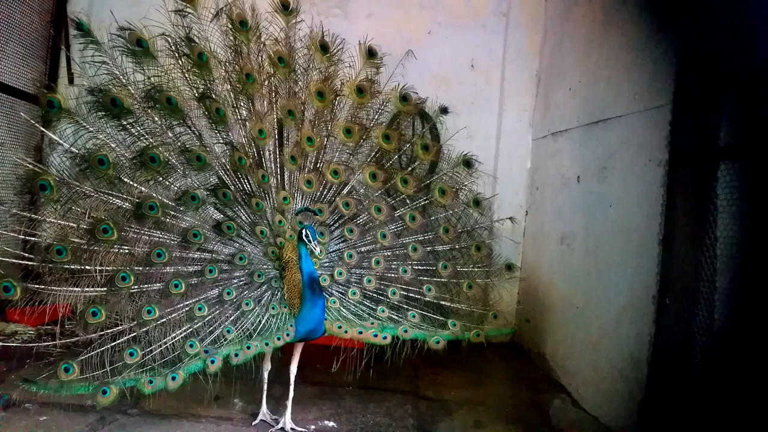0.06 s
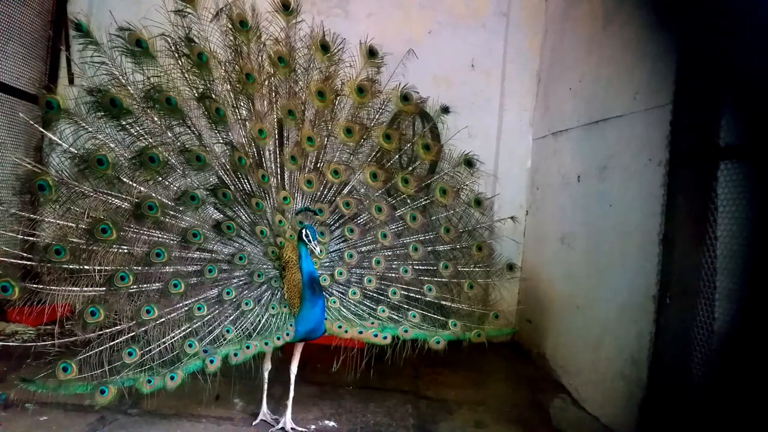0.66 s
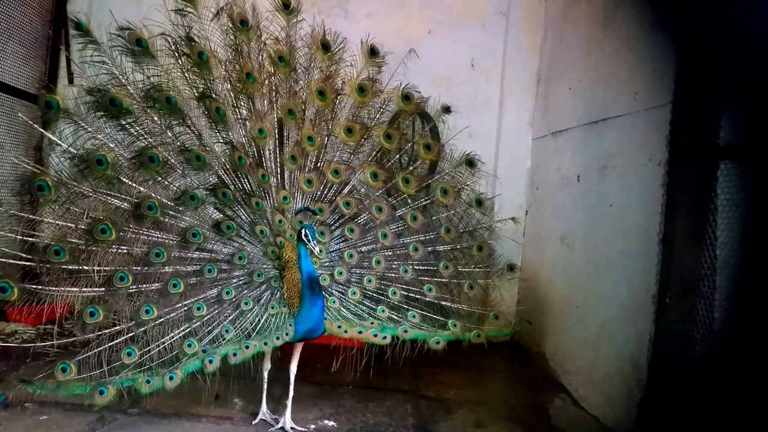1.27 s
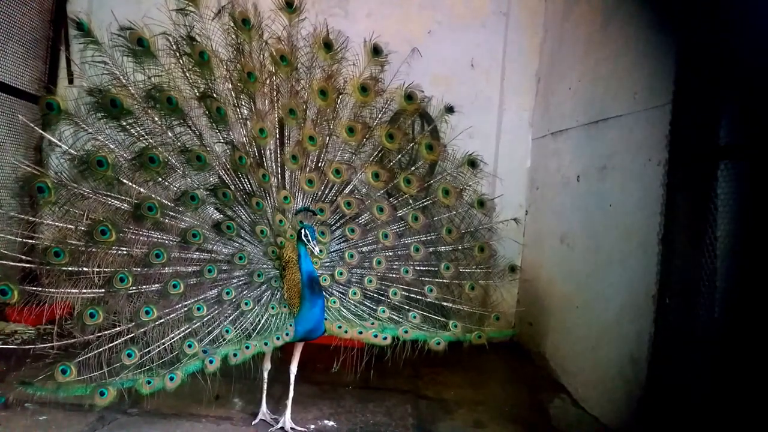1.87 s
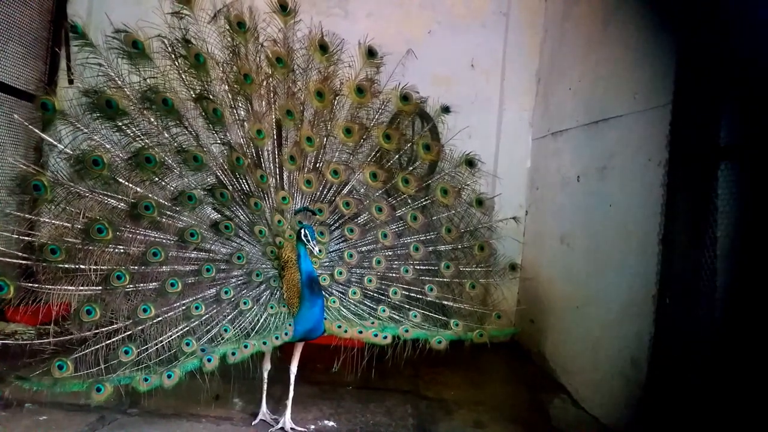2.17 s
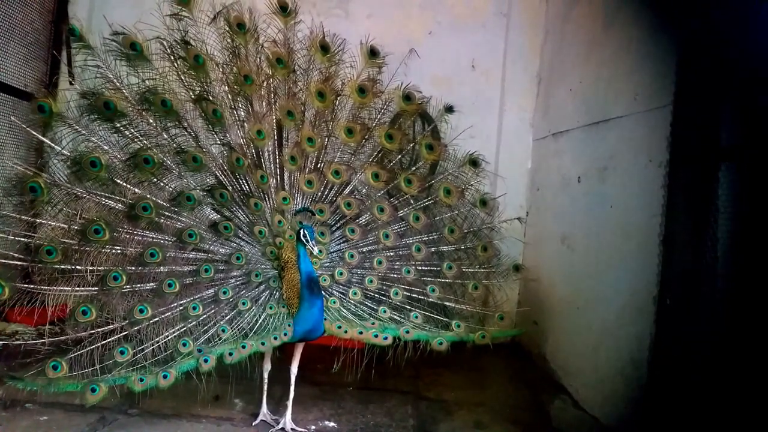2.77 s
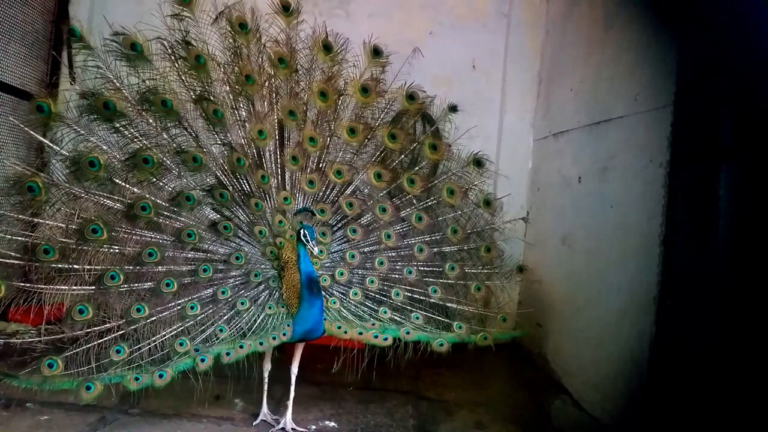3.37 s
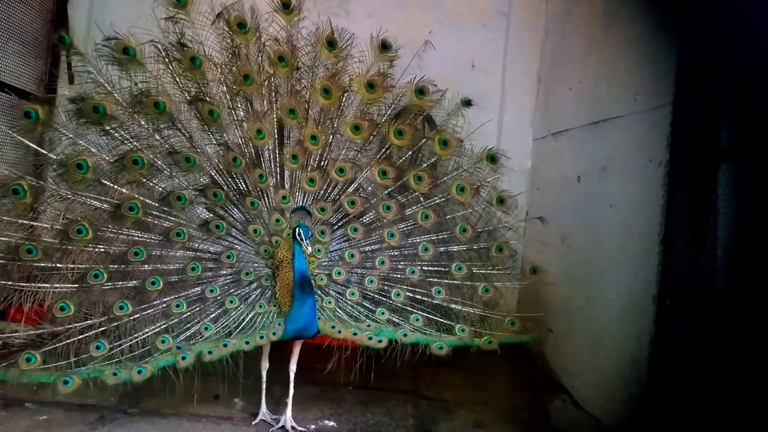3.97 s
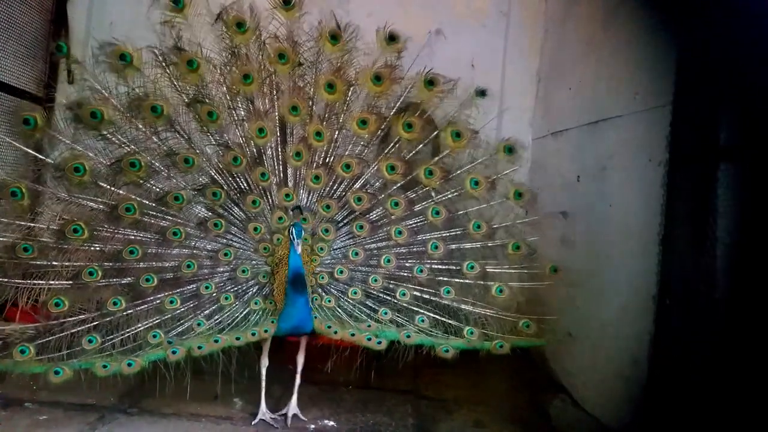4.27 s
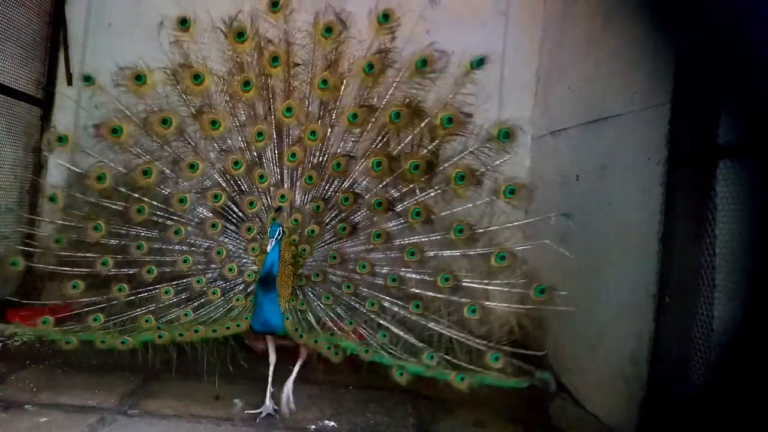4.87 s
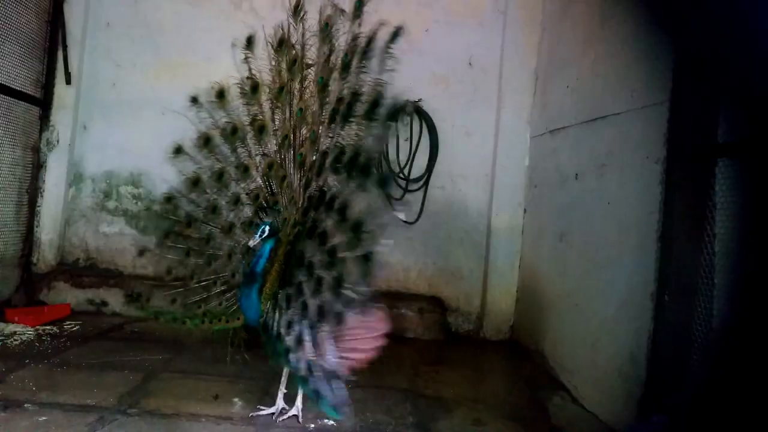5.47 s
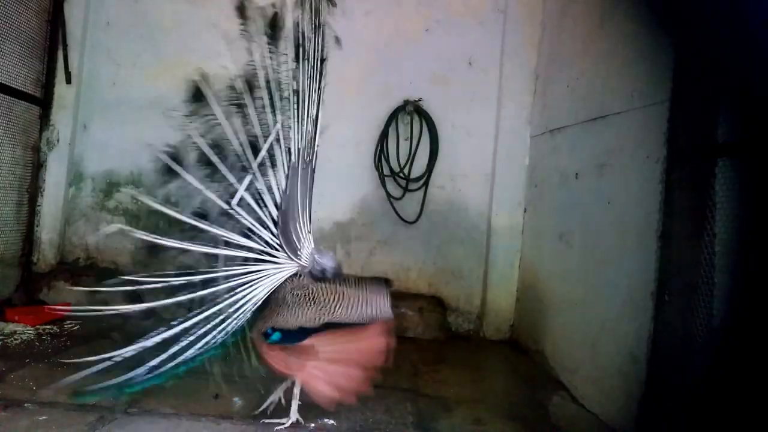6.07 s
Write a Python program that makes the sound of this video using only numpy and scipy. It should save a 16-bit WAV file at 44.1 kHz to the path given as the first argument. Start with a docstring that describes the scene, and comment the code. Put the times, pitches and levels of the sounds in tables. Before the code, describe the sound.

Over a low outdoor rumble and faint hiss, birds yelp and whistle some way off, and a nearby peacock makes a few soft ticks and scrapes. One loud, brief, nasal honk from the peacock rings off the walls of its pen. Four high, rising yelps answer from the distance, while close by the peacock turns with a quiet swishing of feathers, small quill clicks and light footsteps.

```python
"""A peacock displays in a hard-walled pen, over a bed of low outdoor rumble and thin hiss.
Far birds open with rising two-note yelps, then thin and hoarse whistles, while he stirs softly.
At about 3 s he gives one loud, arching honk: a buzzing membrane rings through windpipe and beak.
A low drone comes up and he turns on the spot as the far birds yelp back: plumes rustle,
quills tick, and his feet tap and scrape the floor."""
import sys
import numpy as np
from scipy import signal
from scipy.fft import rfft, irfft, next_fast_len
from scipy.io import wavfile

SR = 44100
rng = np.random.default_rng(int(sys.argv[2]) if len(sys.argv) > 2 else 0)


def store_pcm(level_fs):
    """Save levels as 16-bit WAV."""
    pcm = np.round(np.clip(level_fs, -1, 1) * 32767).astype(np.int16)
    wavfile.write(sys.argv[1], SR, np.atleast_2d(pcm).T)


N = 270333
TIME = np.arange(N) / SR

# stereo image of diffuse noise: (frequency [Hz], left-right likeness [0-1])
STEREO_LIKENESS = [(60, 0.97), (170, 0.93), (350, 0.83), (700, 0.35), (1500, 0), (10000, 0.011)]
# reverb time of the pen: (frequency [Hz], T60 [s])
PEN_T60 = [(300, 0.56), (1000, 0.36), (2300, 0.56), (5000, 0.57), (12000, 0.24)]
# tone of the bed's rumble, midrange air and narrow hiss: (frequency [Hz], gain [dB])
RUMBLE_EQ = [(21, -49), (35, -7.5), (76, -2), (108, -3.5), (130, -0.5), (227, -5), (273, -8.5), (383, -7.5),
             (447, -15.5), (513, -14.5), (555, -16), (828, -20), (1400, -31), (1820, -42), (3080, -120)]
AIR_EQ = [(1000, -18), (1500, 13.5), (2500, 13), (4000, 4), (6000, -7), (7000, -61.5)]
HISS_EQ = [(6500, -25), (7300, -7.5), (8000, 7), (8700, 1), (10000, -7), (10800, -23), (13000, -52)]

# throat resonances of the far birds: (frequency [Hz], gain [dB])
FAR_THROAT = [(1100, 8), (1500, 1), (2200, 5.5), (3030, -0.5), (3220, 1), (3700, 5.5), (4500, -2),
              (5200, -10), (5900, -20), (7000, -19.5), (9000, -39)]
# harmonics of the yelps and of the whistles: (harmonic [number], level [dB])
YELP_PARTIALS = [(1, 3), (2, -7), (3, -5), (4, 2)]
WHISTLE_PARTIALS = [(1, 4.5), (2, -10.5)]
# two-note yelps: (start [s], slide [s], hold [s], fall [s], start pitch [Hz], top pitch [Hz],
# slide level [dB], top level [dB])
YELPS = [(0.054, .085, 0.032, 0.041, 1321, 2390, -44.5, -48.5),
         (0.251, 0.081, .045, 0.09, 1674, 2940, -33.5, -33.5),
         (3.775, 0.12, 0.094, 0.028, 1447, 2982, -43, -33.5),
         (4.001, 0.08, 0.056, 0.065, 1657, 2925, -31, -31.5),
         (4.986, .098, .048, .105, 1526, 2900, -35.5, -33.5),
         (5.398, 0.11, 0.024, 0.1, 1597, 2937, -35, -34)]
# whistles and hoarse cries: (start [s], length [s], start pitch [Hz], end pitch [Hz], level [dB],
# fade [dB], roughness [0-1])
WHISTLES = [(0.992, .1, 1985, 2110, -45.5, -9, 0.16), (2.022, 1.03, 1920, 2265, -47.5, -4.5, 0.93),
            (2.375, 0.084, 1714, 1652, -43.5, -1.5, 0.8), (2.541, .48, 2612, 2670, -52, -3.5, 0.84)]
# envelope of the long thin whistle: (time [s], level [dB])
THIN_WHISTLE_LEVEL = [(1.06, -56), (1.084, -54.5), (1.198, -65), (1.23, -59), (1.684, -64), (1.746, -77),
                      (1.768, -58.5), (1.85, -55.5), (1.94, -55)]
# its pitch settles, holds and droops: (time [s], pitch [Hz])
THIN_WHISTLE_PITCH = [(1.06, 2468), (1.2, 2418.5), (1.8, 2411.5), (1.94, 2365)]

# tone of floor scrapes, foot taps and feathers: (frequency [Hz], gain [dB])
SCUFF_EQ = [(400, -14.5), (750, 0.5), (1000, 4), (1300, -2.5), (2000, -5.5), (4000, -17), (8000, -32),
            (13000, -46)]
STEP_EQ = [(200, 10), (500, 2), (1000, 9.5), (1900, -0.5), (3500, -10), (8000, -52)]
FEATHER_EQ = [(600, -39), (1500, 7), (2500, -2), (4500, 1), (6500, -5.5), (8500, -1.5), (11000, -4),
              (16000, -19)]
# scrapes on the floor and swishes of the train: (peak time [s], length [s], level [dB])
SCUFFS = [(1.83, 0.057, -47), (1.965, 0.23, -41), (5.77, 0.18, -51), (6.02, 0.14, -58)]
SWISHES = [(.42, 0.16, -59), (.84, 0.095, -64), (1.62, 0.26, -60), (1.98, 0.08, -63), (2.44, .16, -60),
           (4.355, 0.071, -53), (4.485, 0.043, -53.5), (4.645, 0.11, -50.5), (4.775, 0.15, -56.5),
           (4.96, 0.18, -53.5), (5.125, 0.094, -51.5), (5.36, 0.091, -50), (5.52, 0.057, -50),
           (5.62, .1, -55), (5.705, 0.24, -50), (5.855, 0.023, -42.5), (5.912, 0.031, -53),
           (6.02, 0.14, -49)]
# feet tapping the floor and quills snapping past each other: (time [s], relative peak [dB])
STEPS = [(0.304, -42.5), (0.928, -61), (4.487, -44.5), (4.667, -55), (5.338, -51), (5.364, -46),
         (5.746, -42), (5.846, -34.5), (6.011, -43)]
QUILL_TICKS = [(0.2625, -27.5), (1.6234, -38), (4.2718, -32.5), (4.6508, -34), (4.9469, -36), (5.1174, -32),
               (5.6814, -39), (5.8403, -32), (5.9052, -57), (5.956, -43)]

# air rasping through the syrinx: (frequency [Hz], gain [dB])
RASP_EQ = [(2000, -14.5), (4100, -4.5), (4600, 0), (5200, 6.5), (6000, -13), (7000, -6), (7600, -34),
           (10300, -6), (12000, -37), (15500, -24)]
# resonances of the peacock's windpipe and open beak: (frequency [Hz], gain [dB])
PEACOCK_THROAT = [(740, -6.5), (1050, -17), (1450, -2.5), (1780, -0.5), (2100, 8.5), (2600, -6), (2850, -2),
                  (3230, 1), (3500, -22), (4080, -25), (4350, -14.5), (4800, -6), (5600, -6.5),
                  (7230, -19.5), (7500, -28), (15000, -36.5)]


def from_db(db):
    """Decibels to gain."""
    return 10 ** (np.asarray(db) / 20)


def rms_one(x):
    """Scale to unit rms."""
    return x / np.sqrt(np.mean(x ** 2) + 1e-20)


def pan(x, left_db):
    """Lift the left side and dip the right by as much; negative leans right."""
    return x * from_db([[left_db], [-left_db]])


def ramp(start_s, length_s, ends):
    """A straight fader move between two values."""
    return np.interp(TIME, [start_s, start_s + length_s], ends)


def in_time(rows, t):
    """Read each column of an envelope at the times t."""
    times, *columns = np.transpose(rows)
    return [np.interp(t, times, column) for column in columns]


def at_hz(points, hz):
    """Read a curve on a log-frequency axis."""
    frequencies, values = np.transpose(points)
    return np.interp(np.log(np.maximum(hz, 1)), np.log(frequencies), values)


def drift(rate_hz, size):
    """Smooth random modulation with a spread of about 1."""
    lowpass = signal.butter(4, rate_hz, fs=SR, output="sos")
    return rms_one(signal.sosfilt(lowpass, rng.standard_normal(size + SR))[SR:])


def bandpass(x, low_hz, high_hz):
    """Keep one band, with gentle skirts."""
    return signal.sosfilt(signal.butter(2, [low_hz, high_hz], "band", fs=SR, output="sos"), x)


def equalise(x, curve):
    """Shape a sound with an EQ curve."""
    size = x.shape[-1]
    padded = next_fast_len(size)
    hz = np.arange(padded // 2 + 1) * SR / padded
    return irfft(rfft(x, padded) * from_db(at_hz(curve, hz)), padded)[..., :size]


def diffuse_noise(curve):
    """Noise from all around: centred in the bass, wide in the treble."""
    mid_eq = [(hz, 10 * np.log10(1 + likeness)) for hz, likeness in STEREO_LIKENESS]
    side_eq = [(hz, 10 * np.log10(1.001 - likeness)) for hz, likeness in STEREO_LIKENESS]
    mid = equalise(rng.standard_normal(N), mid_eq)
    side = equalise(rng.standard_normal(N), side_eq)
    return rms_one(equalise(np.array([mid + side, mid - side]), curve))


def pen_reverb(x, direct_db, wet_db, build_s, lag_s=0):
    """Direct sound, lag_s later on the right, plus wall echoes that build and die band by band."""
    t = TIME[:SR]
    edges_hz = np.geomspace(150, 18000, 9)
    white = rng.standard_normal((2, 2, SR))
    tail = np.zeros((2, SR))
    for k, (low, high) in enumerate(zip(edges_hz, edges_hz[1:])):
        t60_s = at_hz(PEN_T60, np.sqrt(low * high))
        tail += bandpass(white[k % 2], low, high) * from_db(-60 * t / t60_s)
    tail *= 1 - np.exp(-t / build_s)
    tail /= np.sqrt(np.sum(tail ** 2, axis=1, keepdims=True))
    stereo = np.broadcast_to(x, (2, N))
    direct = np.array([stereo[0], np.roll(stereo[1], round(lag_s * SR))])
    echoes = signal.fftconvolve(stereo, tail, axes=1)[:, :N]
    return from_db(direct_db) * direct + from_db(wet_db) * echoes


def hum(pitch_hz, waver_hz):
    """A low sine of unit rms that wavers in pitch."""
    pitch = pitch_hz + waver_hz * drift(5.5, N)
    return np.sqrt(2) * np.sin(2 * np.pi * np.cumsum(pitch) / SR)


def outdoor_bed():
    """Distant rumble, faint air and a hum; a lower drone fades up halfway through."""
    steady_hum = from_db(-54) * hum(pitch_hz=104.1, waver_hz=2.116)
    drone_db = ramp(start_s=3.33, length_s=0.27, ends=(-70, -53.5))
    drone = from_db(drone_db) * hum(pitch_hz=78.8, waver_hz=3.94)
    rumble = from_db(-45.5) * diffuse_noise(RUMBLE_EQ)
    air = from_db(-61.5) * diffuse_noise(AIR_EQ)
    return pan(steady_hum + drone + rumble + air, left_db=0.56)


def thin_hiss(comb_spacing_hz=331.5):
    """Steady treble hiss, faintly comb-filtered by one short echo."""
    hiss = from_db(-58.5) * diffuse_noise(HISS_EQ)
    echo = 0.068 * np.roll(hiss, round(SR / comb_spacing_hz), axis=1)
    return pan(hiss + echo, left_db=-0.93)


def syrinx(contour, partials, throat, jitter, jitter_hz, shimmer, brightening=0, rasp_db=None):
    """A bird's voice: a membrane's harmonics slide under fixed throat resonances.
    Contour is (time [s], pitch [Hz], level [dB], roughness [0-1]); roughness shakes pitch and level."""
    span = (TIME >= contour[0][0]) & (TIME <= contour[-1][0])
    size = span.sum()
    pitch, level_db, rough = in_time(contour, TIME[span])
    tension_swing = np.tanh(drift(jitter_hz, size))
    phase = 2 * np.pi * np.cumsum(pitch * (1 + jitter * rough * tension_swing)) / SR
    # overtones fall away where the bird pushes less hard
    tilt_db = brightening * (level_db - level_db.max())
    partials = [(k, db + tilt_db * (k - 1)) for k, db in partials]
    buzz = sum(from_db(db) * np.sin(k * phase + rng.uniform(0, 2 * np.pi)) for k, db in partials)
    effort = from_db(level_db) * signal.windows.tukey(size, 0.05)
    effort *= 1 + shimmer * rough * drift(jitter_hz, size)
    # loudness follows the effort, wherever the harmonics sit in the resonances
    power = sum(from_db(db + at_hz(throat, k * pitch)) ** 2 / 2 for k, db in partials)
    voice = np.zeros(N)
    voice[span] = equalise(buzz * effort / np.sqrt(power), throat)
    if rasp_db is not None:
        # turbulence escapes in one puff per cycle
        puffs = rng.standard_normal(size) * (1 + np.cos(phase))
        voice[span] += from_db(rasp_db) * rough * effort * rms_one(equalise(puffs, RASP_EQ))
    return voice


def yelp(start_s, slide_s, hold_s, fall_s, start_hz, top_hz, slide_db, top_db):
    """The voice slides up, breaks into a clear high register, drops back and fades."""
    slide_ratio, break_s = 1.47, 0.017
    low_rough, break_rough, top_rough = 0.53, 1, 0.32
    lengths_s, *columns = np.transpose([
        (0, start_hz, slide_db - 8.5, low_rough),
        (slide_s / 2, start_hz * np.sqrt(slide_ratio), slide_db, low_rough),
        (slide_s / 2, start_hz * slide_ratio, (slide_db + top_db) / 2, break_rough),
        (break_s, top_hz, top_db, top_rough),
        (hold_s, top_hz, top_db - 1, top_rough),
        (break_s, 2233, top_db - 1, break_rough),  # the low register takes over again
        (fall_s, 1924, top_db - 15, low_rough)])
    contour = np.transpose([start_s + np.cumsum(lengths_s), *columns])
    return syrinx(contour, YELP_PARTIALS, FAR_THROAT, jitter=0.1003, jitter_hz=175.7, shimmer=0.6)


def whistle(start_s, length_s, start_hz, end_hz, level_db, fade_db, rough):
    """A far cry that swells, then fades, along one straight glide."""
    attack_share = 0.17
    peak_hz = start_hz + attack_share * (end_hz - start_hz)
    contour = [(start_s, start_hz, level_db - 5, rough),
               (start_s + attack_share * length_s, peak_hz, level_db, rough),
               (start_s + length_s, end_hz, level_db + fade_db, rough)]
    return syrinx(contour, WHISTLE_PARTIALS, FAR_THROAT, jitter=0.074, jitter_hz=132, shimmer=1)


def thin_whistle(trim_db=-0.5, rough=0.29):
    """One long, nearly pure note with a slight flutter."""
    times, level_db = np.transpose(THIN_WHISTLE_LEVEL)
    pitch, = in_time(THIN_WHISTLE_PITCH, times)
    contour = np.transpose([times, pitch, level_db + trim_db, np.full_like(times, rough)])
    return syrinx(contour, WHISTLE_PARTIALS, FAR_THROAT,
                  jitter=0.013, jitter_hz=22, shimmer=1, brightening=0.6)


def far_birds():
    """Calls from neighbouring pens, washed in echo and a little left; the thin whistle is driest."""
    yelps = sum(yelp(*row) for row in YELPS)
    thin = thin_whistle()
    whistles = from_db(-3) * thin + sum(whistle(*row) for row in WHISTLES)
    far_yelps = pen_reverb(yelps, direct_db=-10, wet_db=-1, build_s=0.0027, lag_s=0.00042)
    far_whistles = pen_reverb(whistles, direct_db=-4, wet_db=-5, build_s=0.0051, lag_s=0.00036)
    return pan(thin + far_yelps + far_whistles, left_db=0.76)


def stroke_envelope(strokes, standing_db, turning_db):
    """Each rub swells quickly and dies more slowly, over a bed that grows as he turns."""
    rise_share, depth_db = 0.62, 14
    bed_db = ramp(start_s=3.2, length_s=2.5, ends=(standing_db, turning_db))
    power = from_db(bed_db) ** 2
    for peak_s, length_s, level_db in strokes:
        from_peak = np.maximum((peak_s - TIME) / rise_share, TIME - peak_s) / length_s
        power += from_db(level_db - depth_db * np.minimum(from_peak, 10)) ** 2
    return np.sqrt(power)


def scuffing():
    """Dull scraping on the floor."""
    return stroke_envelope(SCUFFS, standing_db=-63, turning_db=-56) * diffuse_noise(SCUFF_EQ)


def taps(hits, curve, decay_s, gain_db):
    """Each contact of a quill or foot is a noise burst that dies at once."""
    track = np.zeros((2, N + SR))
    t = TIME[:SR // 10]
    for time_s, peak_db in hits:
        burst = equalise(rng.standard_normal((2, len(t))), curve) * np.exp(-t / decay_s)
        start = round(time_s * SR)
        track[:, start:start + len(t)] += from_db(peak_db + gain_db) * burst / np.abs(burst).max()
    return track[:, :N]


def feather_rustle(slips_per_s=1300, slip_spread_db=4.5, swish_db=5, swish_hz=21.7):
    """Barbs catch and slip in tiny clicks; each group of plumes swishes in its own band and time."""
    slips = (rng.random((2, N)) < slips_per_s / SR) * rng.choice([-1, 1], (2, N))
    slip_sizes = from_db(slip_spread_db * np.minimum(rng.exponential(1, (2, N)), 4))
    friction = rng.standard_normal((2, N))
    rubbing = rms_one(slips * slip_sizes) + friction
    edges_hz = np.linspace(600, 16500, 9)
    plumes = np.zeros((2, N))
    for k, (low, high) in enumerate(zip(edges_hz, edges_hz[1:])):
        flutter = from_db(swish_db * drift(swish_hz, N))
        plumes += (-1) ** k * bandpass(rubbing, low, high) * flutter  # flips avoid crossover notches
    envelope = stroke_envelope(SWISHES, standing_db=-91, turning_db=-64.5)
    return envelope * rms_one(equalise(plumes, FEATHER_EQ))


def peacock_movement():
    """Quill ticks, footsteps and the rustling train, close up, with echo off the walls."""
    ticks = taps(QUILL_TICKS, FEATHER_EQ, decay_s=0.0015, gain_db=-1)
    steps = taps(STEPS, STEP_EQ, decay_s=0.0037, gain_db=9.5)
    return pen_reverb(ticks + steps + feather_rustle(), direct_db=2, wet_db=-5.5, build_s=0.0045)


def honk_contour(start_s=3.06, crest_s=3.145, hold_db=-18):
    """Membrane tension lifts the pitch in a flat-topped arch; the slacker it is, the rougher."""
    start_hz, top_hz, end_hz = 701.5, 797.8, 663
    lift_s, fall_s, flatness = 0.061, 0.072, 3.1
    # onset, attack, swell, hold, fade, then a short catch up and down
    stages_s = start_s + np.cumsum([0, 0.025, 0.067, 0.072, 0.031, 0.012, 0.012])
    t = TIME[(TIME >= stages_s[0]) & (TIME <= stages_s[-1])]
    level_db = hold_db + np.interp(t, stages_s, [-18, -5, 0, 0, -16.5, -9, -26])
    rising = t < crest_s
    from_crest = np.abs(t - crest_s) / np.where(rising, lift_s, fall_s)
    tension = np.exp(-from_crest ** flatness)
    pitch = tension * top_hz + (1 - tension) * np.where(rising, start_hz, end_hz)
    rough = np.interp(pitch, [end_hz, top_hz], [0.5, 0.28])
    return np.transpose([t, pitch, level_db, rough])


def peacock_honk():
    """A bright buzz through windpipe and beak: clear at the crest, hoarse as it falls."""
    harmonics = [(k, 0) for k in range(1, 20)]
    honk = syrinx(honk_contour(), harmonics, PEACOCK_THROAT,
                  jitter=0.035, jitter_hz=147, shimmer=0.14, brightening=0.11, rasp_db=-9.5)
    ringing = pen_reverb(honk, direct_db=-3, wet_db=0, build_s=0.00037, lag_s=0.00037)
    return pan(ringing, left_db=0.65)


def scene():
    """The mix: the peacock up front, far birds behind him, the outdoor bed underneath."""
    return peacock_movement() + peacock_honk() + far_birds() + scuffing() + outdoor_bed() + thin_hiss()


def record(dry, cutoff_hz=15900):
    """A steep high cut on the whole mix."""
    return signal.sosfilt(signal.ellip(10, 0.1, 90, cutoff_hz, fs=SR, output="sos"), dry)


dry = scene()
out = record(dry)
store_pcm(out)
```